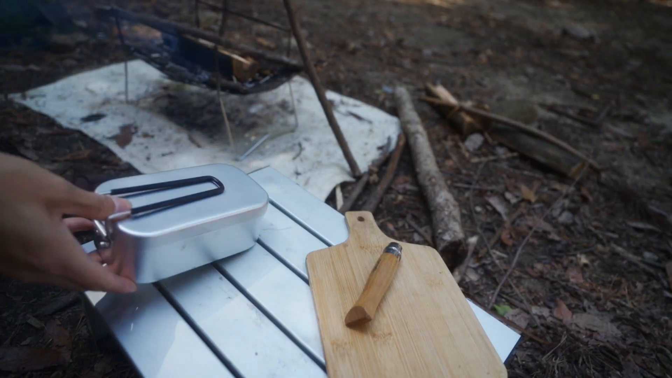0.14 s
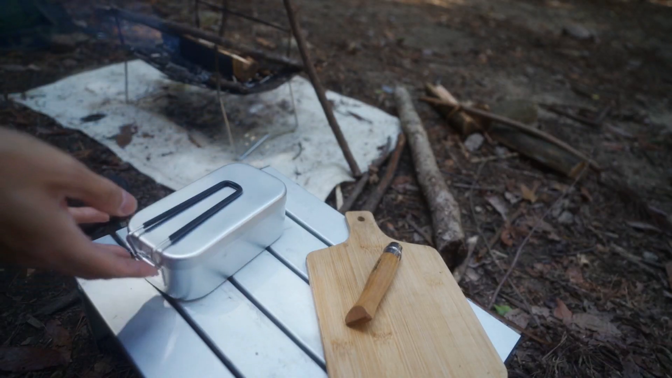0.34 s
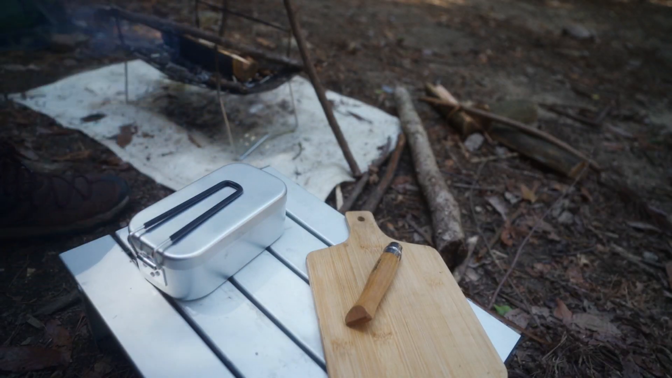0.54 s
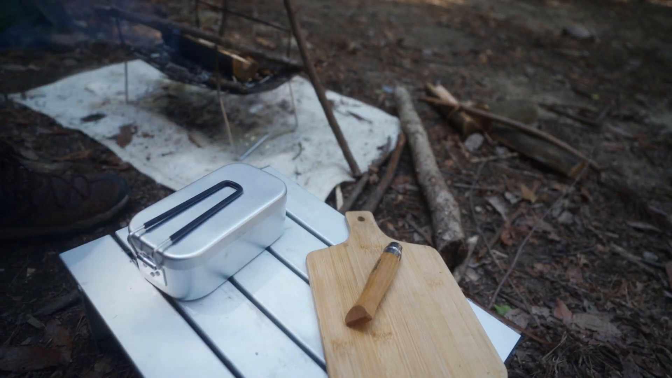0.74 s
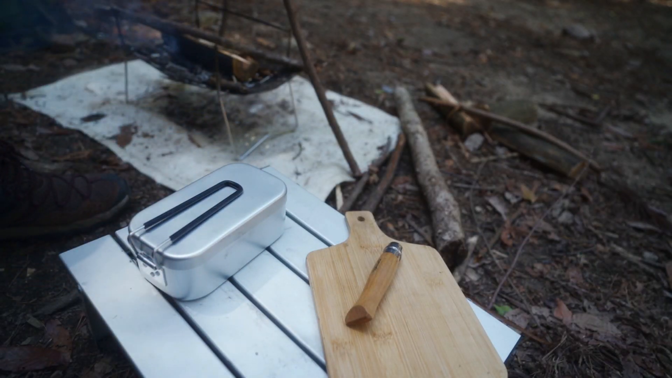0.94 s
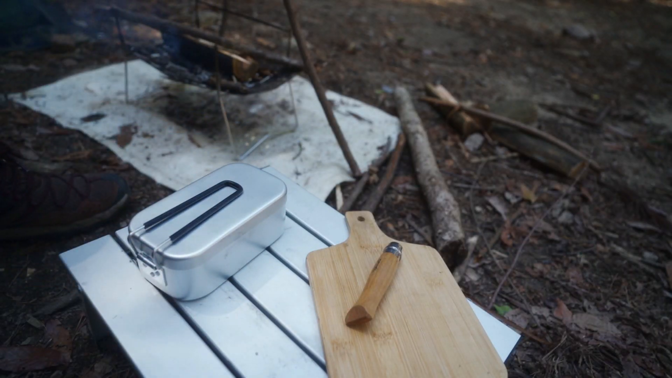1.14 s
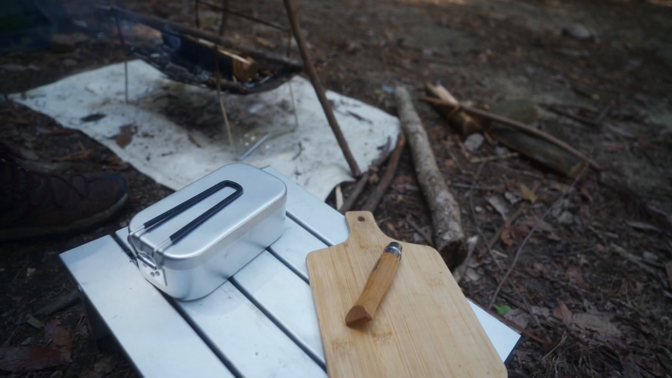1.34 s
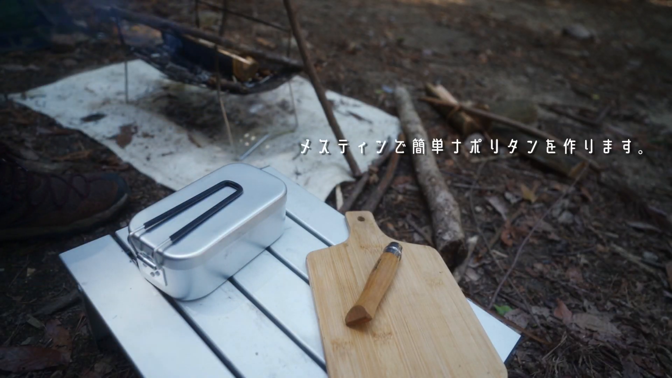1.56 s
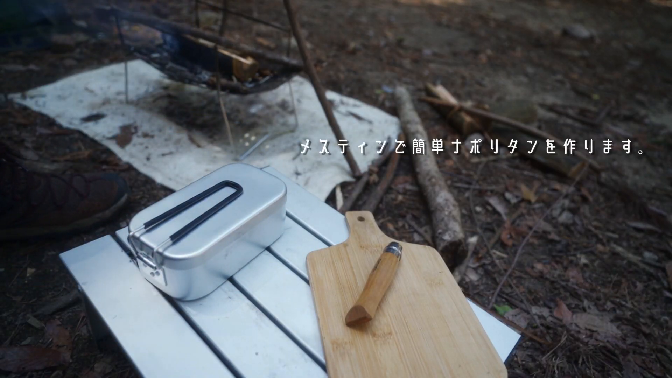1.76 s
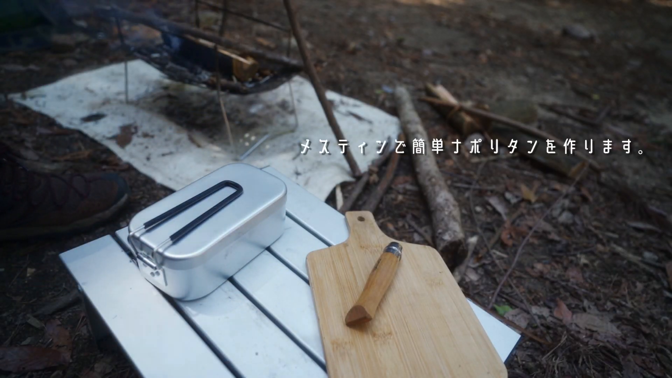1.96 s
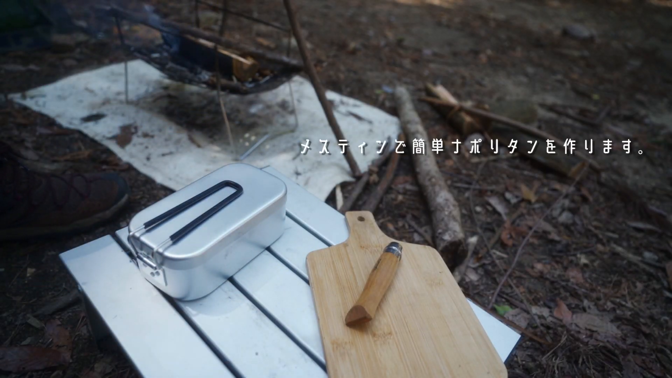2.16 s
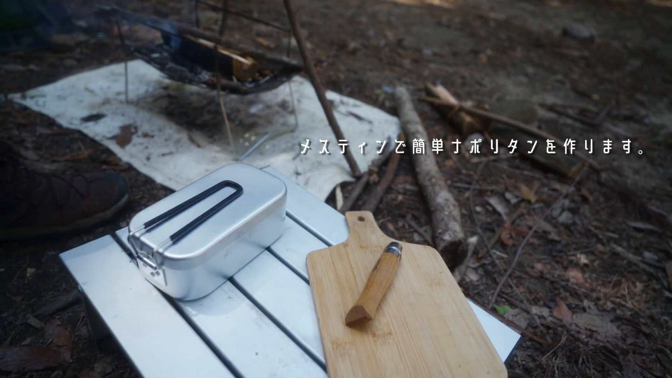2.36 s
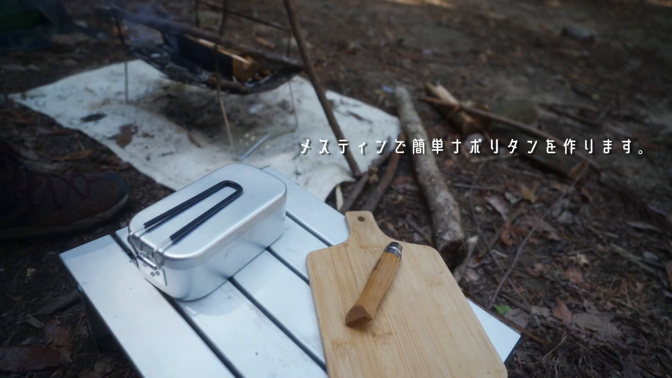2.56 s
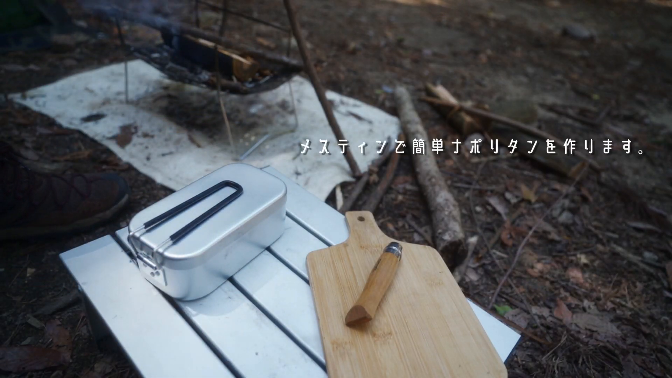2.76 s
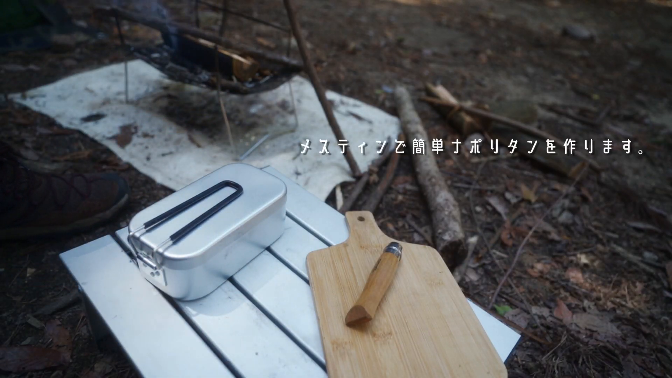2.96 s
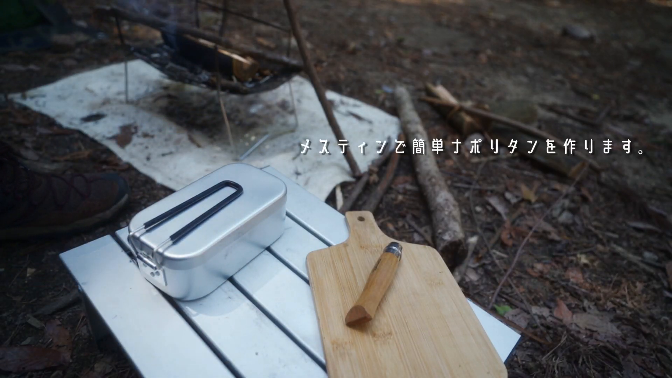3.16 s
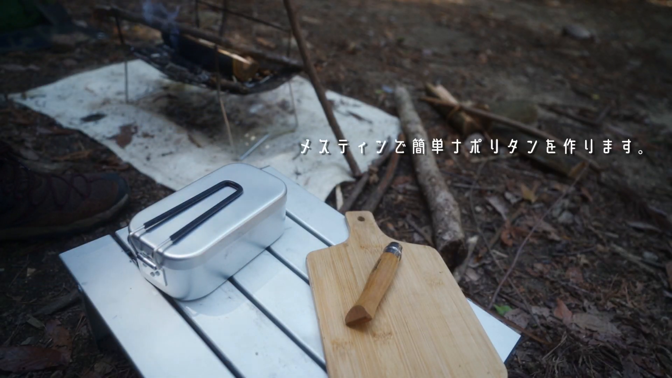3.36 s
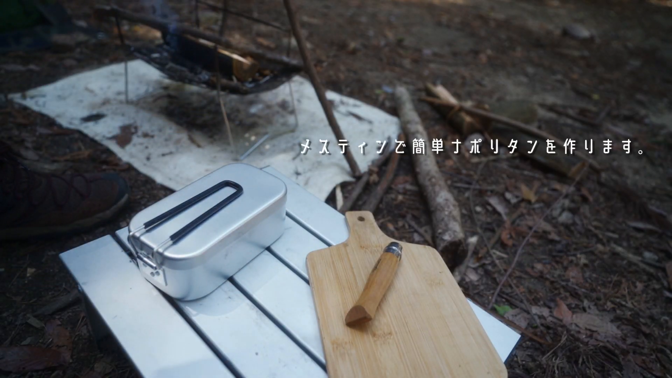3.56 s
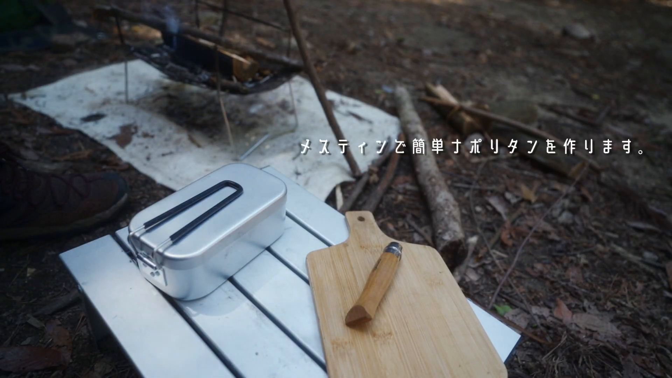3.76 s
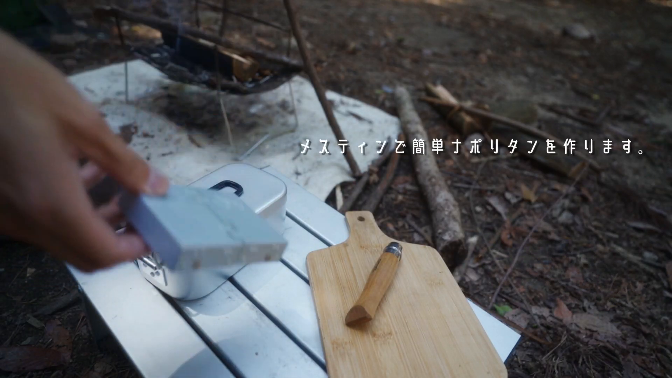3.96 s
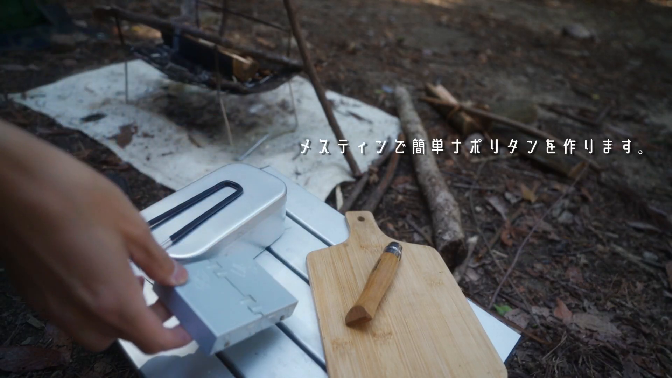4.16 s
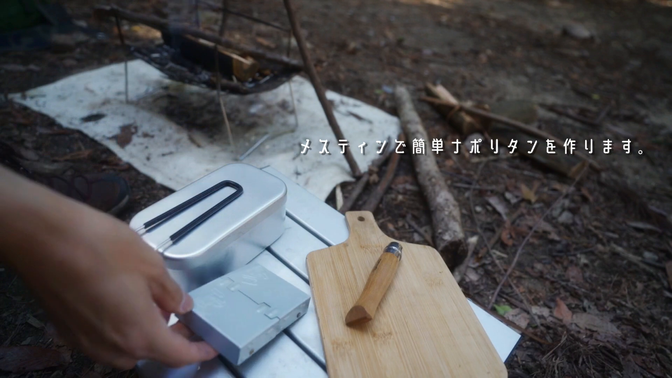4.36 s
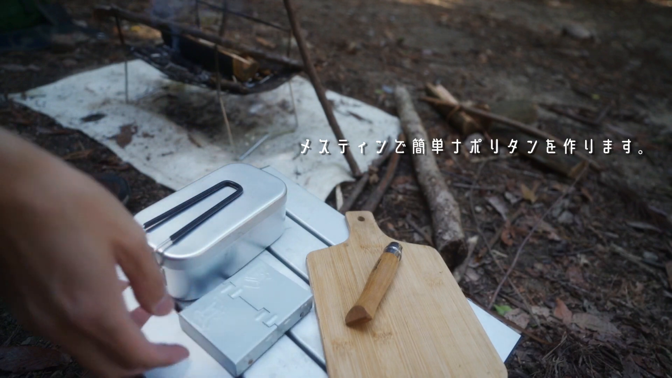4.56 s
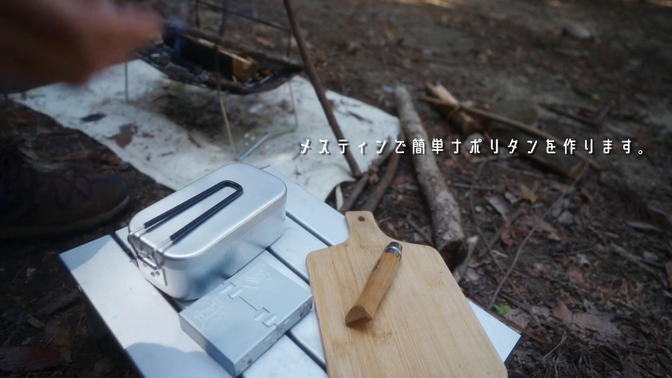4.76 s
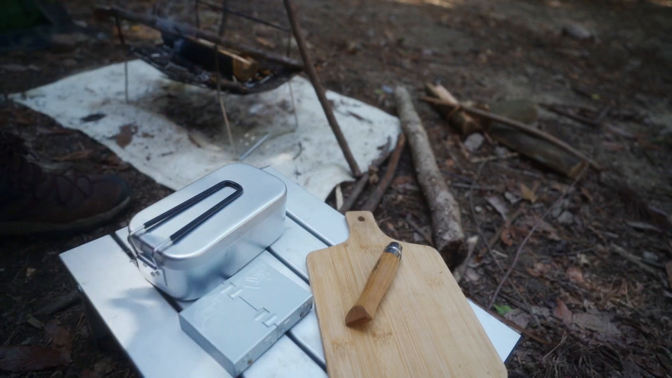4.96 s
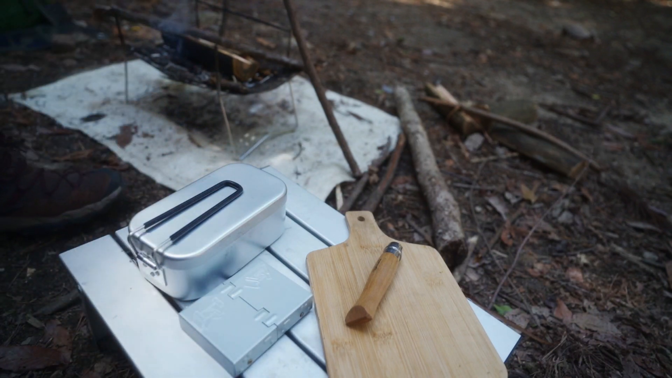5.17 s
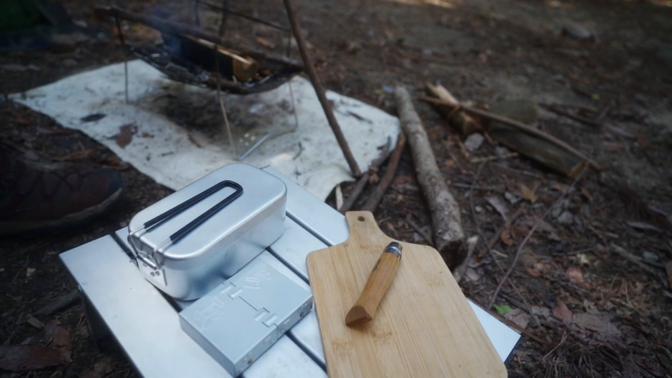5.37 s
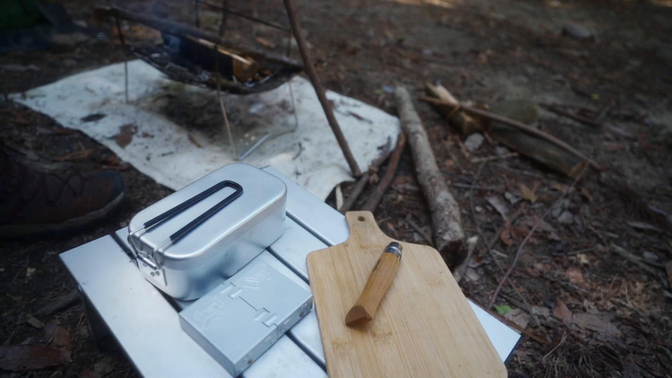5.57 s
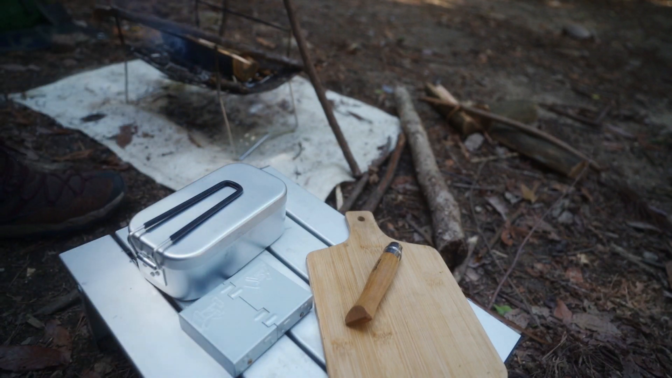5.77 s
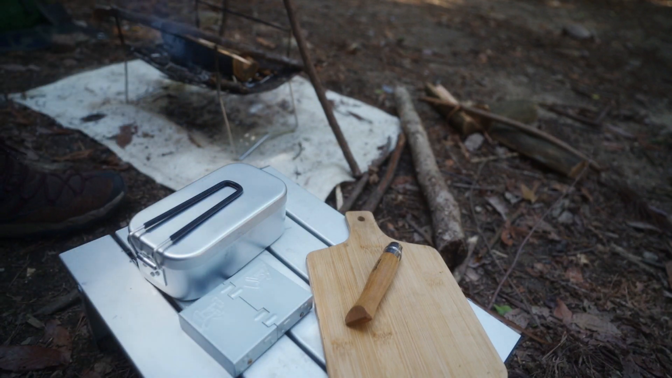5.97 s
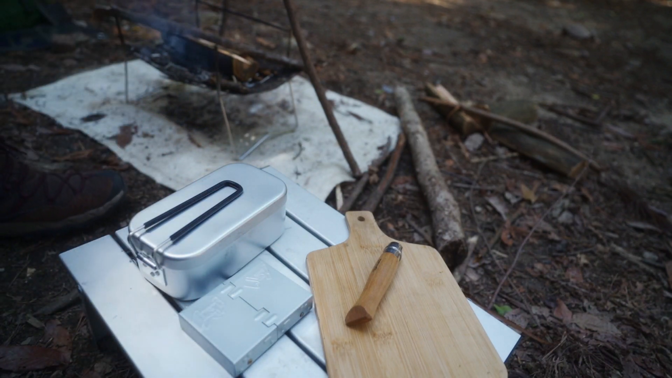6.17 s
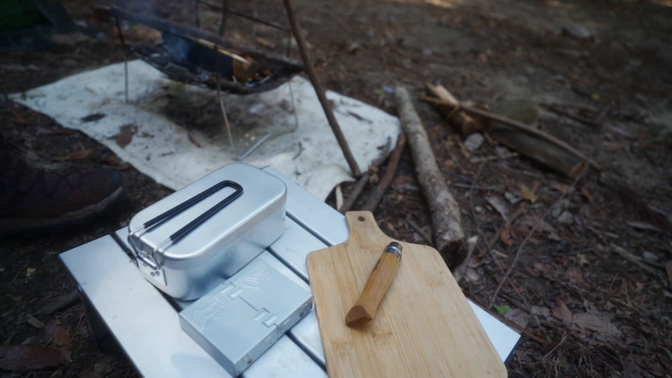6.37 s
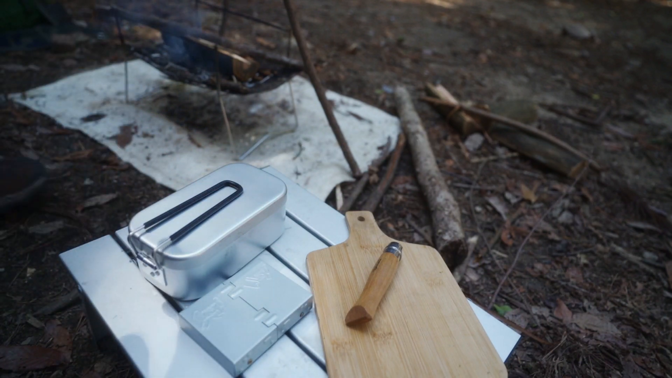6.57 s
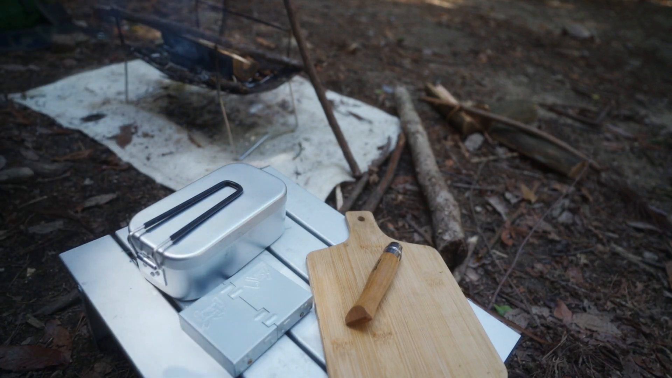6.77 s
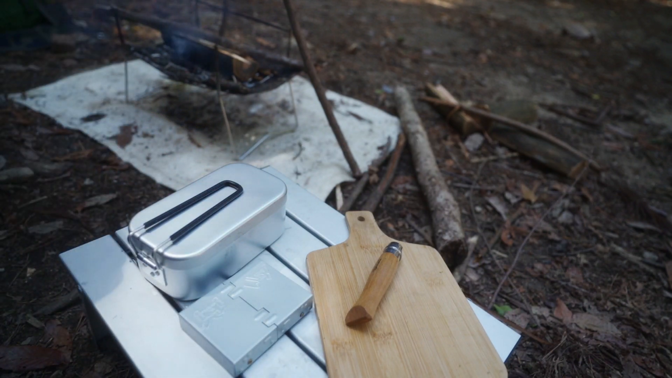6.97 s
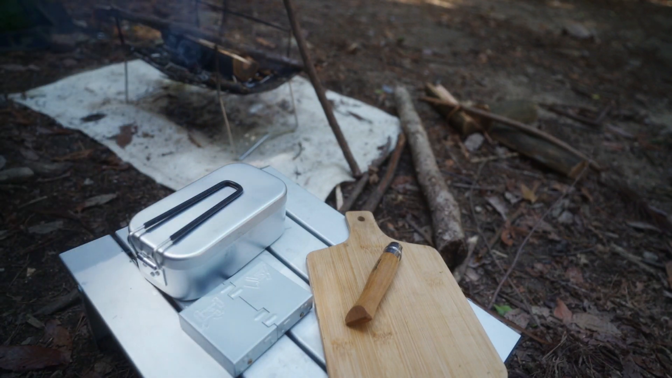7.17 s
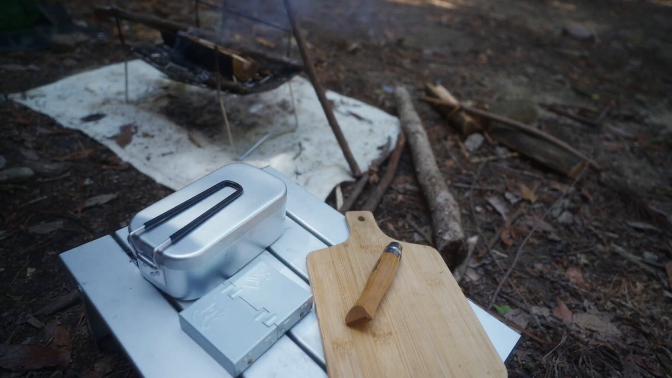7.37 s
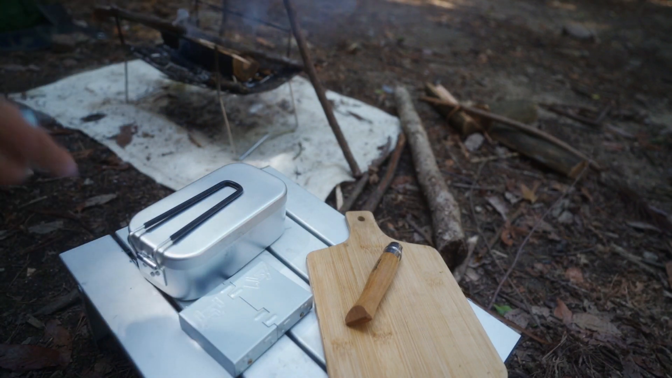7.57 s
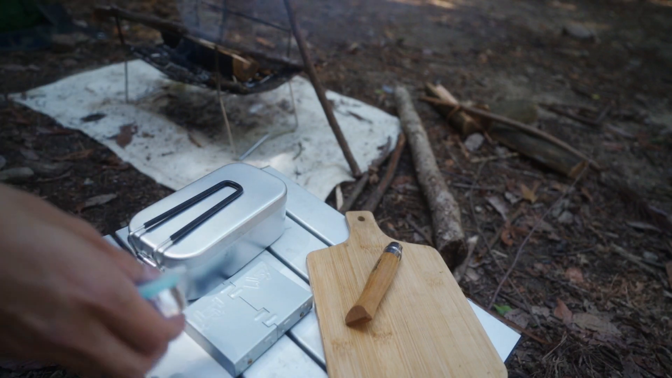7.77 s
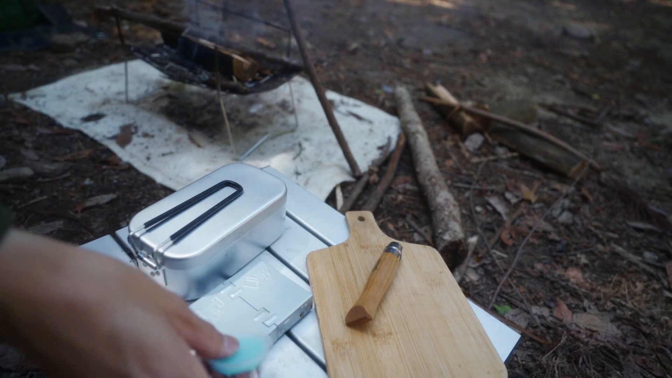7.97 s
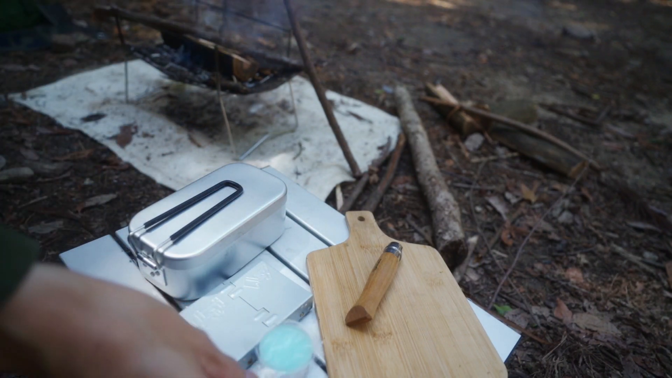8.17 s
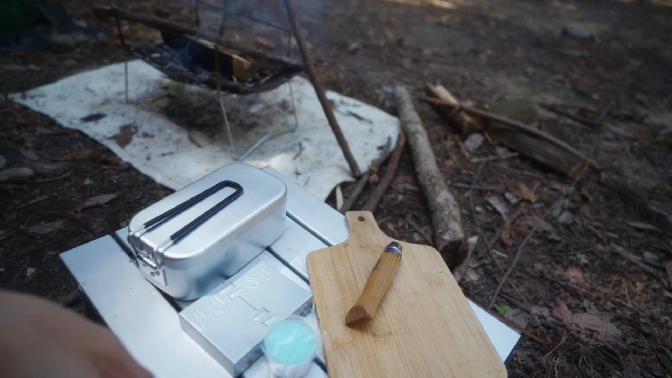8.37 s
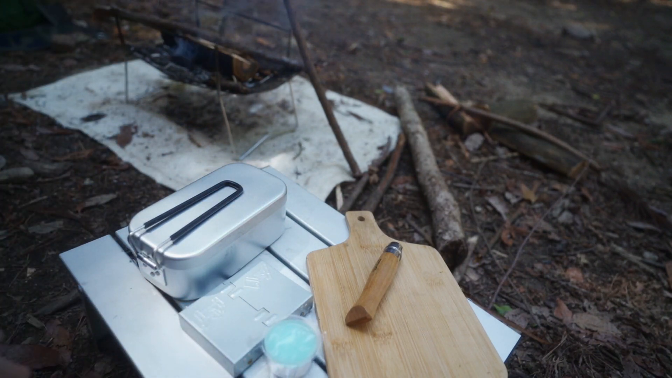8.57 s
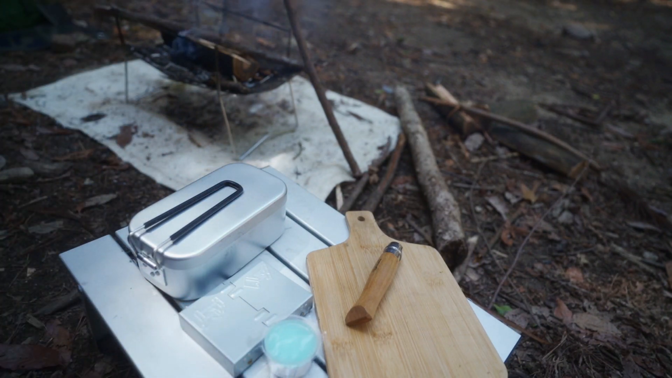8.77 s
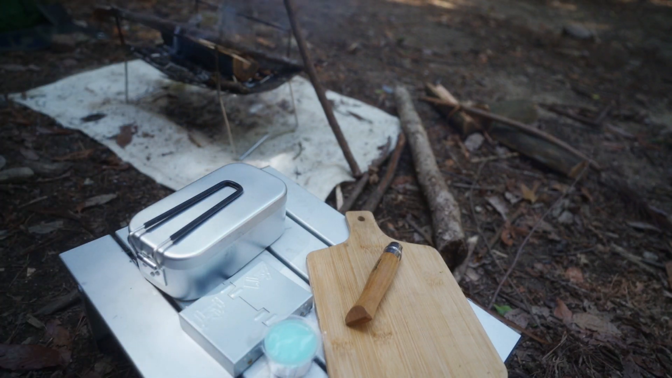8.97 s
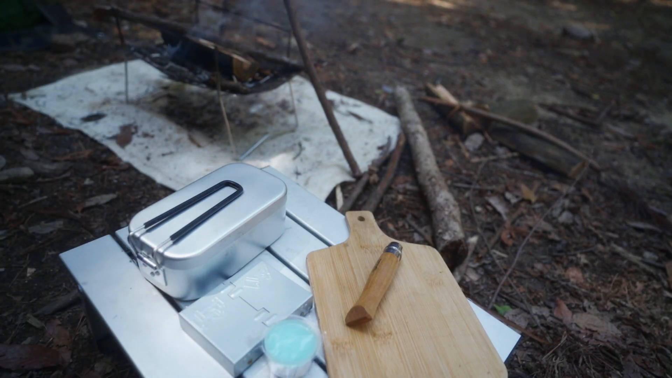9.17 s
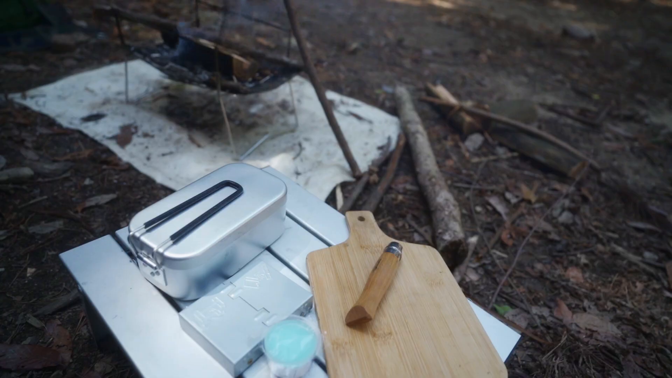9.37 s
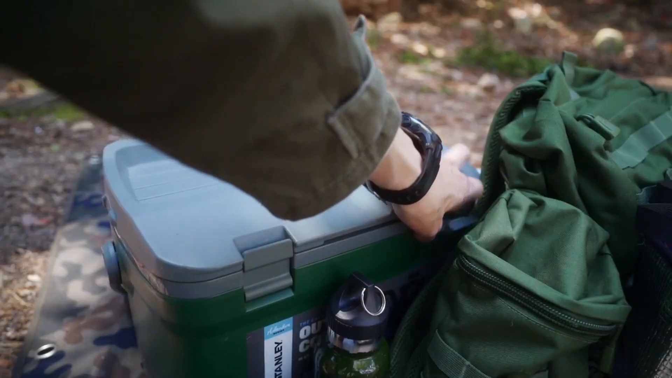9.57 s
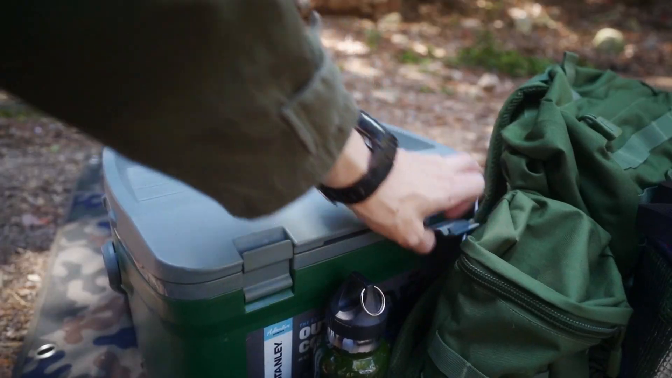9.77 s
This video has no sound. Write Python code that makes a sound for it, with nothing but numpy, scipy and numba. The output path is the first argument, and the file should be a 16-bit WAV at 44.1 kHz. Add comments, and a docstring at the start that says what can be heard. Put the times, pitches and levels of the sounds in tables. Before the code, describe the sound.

A mess tin lands close by on a slatted aluminium table with a ringing clank. Tins knock and scrape softly further off, then a folding stove clatters onto the slats. A wrapper crinkles in dry snaps, a fuel tablet is set down, and a hollow plastic cooler lid thumps. Small birds whistle faintly over quiet woodland air, rustling sleeves and light wind on the microphone.

```python
"""A woodland camp, over a bed of air, far hum, wind on the microphone and rustling sleeves and leaves.
A mess tin lands on a slatted aluminium table and both ring. A hand rummages in a box of tins, which
knock and scrape; then a folding stove clatters onto the slats. Small birds whistle through the trees
while a wrapper crinkles in dry snaps and a fuel tablet is set down. Last, a hollow cooler lid thumps."""
import sys
import numpy as np
from scipy import signal
from scipy.fft import rfft, irfft
from scipy.io import wavfile
from scipy.ndimage import uniform_filter1d
from numba import njit

SR = 44100
rng = np.random.default_rng(int(sys.argv[2]) if len(sys.argv) > 2 else 0)


def materialize(psi):
    """Save the field psi as 16-bit PCM at rate SR to the path in sys.argv[1].

    A 1-D psi becomes a single channel; in a 2-D psi each row is a channel.
    """
    bounded = np.clip(np.atleast_2d(psi).T, -1, 1)
    quanta = np.round(bounded * 32767).astype(np.int16)
    wavfile.write(sys.argv[1], SR, quanta)


N = 433062
T = np.arange(N) / SR

# tone of the air bed: (frequency [Hz], relative level [dB])
AIR_SPECTRUM = [(15, -42.5), (25, -5), (66, -1.5), (123, -22), (157, -2), (256, -9.5), (439, -11.5),
                (1020, -11), (3340, -46.5), (4030, -32.5), (4870, -29.5), (13200, -32), (16000, -45)]
# fader ride on the far hum: (time [s], level [dB])
HUM_RIDE = [(0, -66.5), (1.2, -70), (1.86, -71.5), (2.4, -66), (3.6, -68.5), (4.0, -73.5), (6.8, -77),
            (7.1, -67.5), (9.82, -78.5)]
# wind puffs and ground thumps: (start [s], length [s], wind level [dB], hum level [dB])
PUFFS = [(.12, 0.52, -59.5, -61.5), (3.55, 0.4, -63, -75), (4.4, 0.38, -62, -73), (5.497, 0.82, -69.5, -83),
         (6.444, .6, -67, -84), (7.299, 0.24, -59.5, -73), (8.101, .2, -63.5, -58.5),
         (8.7, 0.64, -69.5, -78), (9.58, 0.26, -48, -49)]

# shape of each bird call: (time into the call [s], pitch [Hz], relative level [dB])
HIGH_CALL = [(0, 2340, -8), (.004, 4430, -22.5), (.05, 5240, -13.5), (.1, 6600, -10), (.108, 6500, -34.5),
             (.118, 4760, -24), (.125, 2900, -11), (.138, 2786, -39), (.148, 2900, -11),
             (.152, 4600, -10.5), (.158, 4570, -45)]
LOW_CALL = [(0, 3270, -10), (.01, 4775, -11), (.04, 4755, -9.5), (.07, 5404, -0.5), (.078, 5430, -21),
            (.085, 4750, -0.5), (.095, 3300, -8.5), (.115, 3820, -14), (.125, 3627, -50)]
SHORT_CALL = [(0, 3965, 12), (.03, 4370, -12), (.09, 4400, -17), (.11, 4370, -30.5)]
THIN_CALL = [(0, 3800, -4), (.03, 3950, 0), (.1, 4000, -3), (.25, 4250, -8), (.42, 4400, -10),
             (.46, 4400, -40)]
WISP_CALL = [(0, 6700, -9), (.05, 7000, 1.5), (.2, 6900, -4), (.3, 6940, -25.5)]
FALLING_CALL = [(0, 3890, -13), (.04, 3780, -10), (.06, 3414, -1), (.09, 3200, -3.5), (.13, 3000, -9),
                (.15, 3030, -37)]
# cues for those calls: (time [s], level [dB])
HIGH_CUES = [(8.252, -44.5), (8.575, -42.5), (8.89, -39.5), (9.205, -41)]
LOW_CUES = [(3.3, -66.5), (6.651, -51.5), (6.935, -49.5), (7.227, -49)]
SHORT_CUES = [(3.5, -62.5)]
THIN_CUES = [(5.26, -71), (5.92, -67.5)]
WISP_CUES = [(5.639, -71), (6.33, -74)]
FALLING_CUES = [(7.976, -54)]

# cloth and dry leaves stir: (start [s], length [s], hiss level [dB], dull level [dB])
RUSTLES = [(-.15, 0.84, -59, -62.5), (3.102, 0.4, -69.5, -72), (3.701, 0.92, -60, -63),
           (4.642, 0.62, -58.5, -64), (5.055, 0.086, -59, -60), (5.195, 0.73, -69.5, -78.5),
           (5.848, 0.25, -55.5, -64), (6.363, 0.52, -54.5, -58), (6.565, 0.17, -53, -49),
           (6.874, 0.33, -58.5, -65), (7.127, 0.49, -57.5, -62), (7.564, 0.084, -48, -56),
           (7.694, 0.26, -55, -63.5), (7.976, 0.38, -54.5, -62.5), (8.699, 0.39, -67, -76),
           (9.545, 0.38, -60.5, -57)]
# a sleeve swishes past: (start [s], length [s], level [dB])
SWISHES = [(-.1, .8, -62), (3.743, 0.62, -59.5), (4.66, 0.59, -59)]
# wrapper, twig and ember ticks: (time [s], level [dB], centre [Hz], width [octaves])
TICKS = [(0.971, -42.5, 1980, 3.5), (0.7044, -61, 12000, 1.2), (1.466, -38, 7420, 5.8),
         (1.4855, -14.5, 11000, 1), (3.3108, -46, 6280, 2.1), (3.4094, -28.5, 8650, 6.5),
         (5.0185, -43.5, 1243, 1.5), (5.073, -42.5, 1210, 6.1), (5.1841, -40.5, 3250, 1.65),
         (5.336, -47.5, 2530, 2.5), (5.5515, -49, 1000, 1.2), (5.718, -48.5, 1650, 1.07),
         (6.297, -50, 13030, 0.46), (6.444, -34, 1070, 4.6), (6.597, -15.5, 4020, 2.7),
         (6.6118, -11.5, 2640, 1.8), (6.75, -37, 1480, 2.2), (6.887, -42, 8960, 1.7),
         (6.9345, -42, 2720, 3.1), (7.3154, -26, 6130, 14), (7.33, -27, 4970, 0.58),
         (7.3468, -29.5, 4600, 0.94), (7.385, -34, 4020, 1.7), (7.413, -29.5, 6890, 7.8),
         (7.43, -32.5, 6260, 4.7), (7.4476, -35, 2430, 2.1), (7.4828, -35, 2650, 0.9),
         (7.585, -37, 2950, 0.83), (7.594, -27.5, 3150, 0.9), (7.6144, -28, 3320, 1.1),
         (7.623, -36, 3750, 0.53), (7.6707, -19.5, 4600, 1.22), (7.6807, -19, 5400, 6.4),
         (7.7634, -27.5, 1920, 2), (7.7767, -25.5, 3640, 1.7), (7.8052, -28, 1730, 1.8),
         (7.8687, -28, 5870, 6.2), (7.886, -23.5, 8670, 8.8), (7.908, -28, 5890, 5.9),
         (7.917, -25, 2140, 2.4), (7.9687, -36, 2800, 1.8), (8.0137, -30.5, 1390, 3.5),
         (8.0696, -35.5, 3120, 0.66), (8.1253, -33.5, 3780, 1), (8.1332, -30, 1960, 1.2),
         (8.6177, -44.5, 7500, 1.4), (8.3627, -23.5, 6430, 3.9), (8.7111, -21, 4300, 1.9),
         (8.735, -35.5, 4030, 1.3), (8.754, -25, 1040, 4.6), (9.1488, -25, 4000, 1.7)]

# hits, with bass (below 800 Hz) and treble (above 2.5 kHz) set against the level:
# (time [s], level [dB], bass [dB], treble [dB], pitch the struck spot favours [Hz])
BOX_HITS = [(1.246, -41, 3.5, -10.5, 1410), (1.407, -47, 2, -0.5, 1280), (1.484, -34.5, 4.5, 7.5, 1092),
            (1.511, -34, 3, -0.5, 1010), (1.584, -48, 8, -17, 1020), (1.621, -36, 0, 5.5, 980),
            (1.671, -35, 5.5, -13, 1240), (1.688, -44, 10.5, -3, 1620), (1.758, -53, 10.5, 0, 1600),
            (1.803, -37.5, 6, -5, 1130), (1.832, -48.5, 16, 5, 1120), (1.925, -33.5, 2, 5, 1460),
            (1.949, -42.5, 9, 1, 1350), (1.983, -34, 4, -10, 1020), (2.074, -44, -19, -0.5, 1546),
            (2.166, -46, 2, 1.5, 2460), (2.222, -33.5, 3, -1, 1086), (2.29, -37, 1.5, -4.5, 1130),
            (2.369, -48.5, 10, -0.5, 1140), (2.436, -49, 6, 3, 1440), (2.501, -41.5, 9, -26, 1100),
            (2.558, -44, 2, -8, 1570), (2.723, -46, -2.5, -14, 1094), (2.826, -42.5, -0.5, -11.5, 1084),
            (2.905, -29.5, 0.5, 8.5, 2470), (2.971, -42.5, -15, -9, 1510), (3.003, -23.5, -13, 2.5, 1540),
            (3.028, -30, 2, 5, 1485), (3.068, -48, -10, 18, 1500), (3.095, -36, -2, 6.5, 1090),
            (3.194, -44.5, -31, -7, 1490), (3.508, -42.5, -26, -2.5, 1530), (3.763, -38, -29, -1, 1530),
            (3.904, -34.5, -29, -4, 1583), (5.756, -41.5, -5.5, -3, 2210), (5.883, -39, -5.5, 4.5, 2140)]
COOLER_HITS = [(9.6, -5.5, 5.3, -15, 1038), (9.635, -26.5, 15, -17, 842), (9.716, -36.5, 12.2, -14, 870)]
TIN_HITS = [(0.123, -4.5, -2.5, -11, 1720), (0.15, -15.5, -11, -12, 1650), (0.177, -18, 3.5, -39, 1600),
            (0.279, -33.5, -9.5, -12, 1770), (0.341, -1.5, -25, -14, 1870), (0.364, -15, -12, -18, 1600),
            (0.389, -13, -6.5, -12.5, 1064), (0.413, -23.5, -6, -10, 1650)]
STOVE_HITS = [(4.335, -7.5, -17, -7, 802), (4.388, -30.5, -23, -2, 1760), (4.419, -43, -22, 13, 1750),
              (4.454, -30, -1, -8.5, 1820), (4.545, -10.5, -7, -14, 1196), (4.553, -6.5, -16, -8.5, 1650),
              (4.58, -15, -11.5, -15.5, 1650), (4.604, -8.5, -6, -16.5, 1830),
              (4.644, -22, -19, -13.5, 1750), (4.669, -34.5, 7, -18, 921), (4.689, -35.5, 5, -26, 1000)]
TABLET_HITS = [(8.013, -41, 7, -14, 900), (8.152, -8, 1.5, -13, 1970), (8.161, -14.5, 0, -21, 1650),
               (8.195, -14.5, 3.5, -14.5, 1780), (8.23, -19, -1.5, -15, 1776), (8.258, -40, 14, -17, 1660),
               (8.288, -37.5, -6, -6, 1200)]
# drags along a surface: (start [s], length [s], level [dB], treble against the level [dB])
BOX_DRAGS = [(1.47, 0.22, -52.5, -16), (1.72, 0.23, -54.5, -6.5), (1.94, 0.21, -50.5, -3.5),
             (2.14, 0.44, -59, -15), (2.84, .06, -52.5, -4), (2.9, 0.241, -43, -2),
             (3.19, 0.054, -60.5, 3.5)]
COOLER_DRAGS = [(9.547, 0.055, -53, 1.5), (9.621, 0.068, -42.5, 10), (9.69, .14, -49.5, -10),
                (9.744, 0.038, -46.5, 8)]
TIN_DRAGS = [(.16, .18, -37.5, -6), (0.264, .075, -39.5, 2), (0.347, .07, -25, -9)]
STOVE_DRAGS = [(4.359, 0.14, -37.5, -0.5), (4.537, 0.005, -25, -4), (4.555, .065, -25, -3)]
TABLET_DRAGS = [(8.16, 0.08, -29.5, -16), (8.25, 0.074, -48, -9)]
# resonances of each body: (frequency [Hz], relative level [dB], free ring time to -60 dB [s])
BOX_MODES = [(312, -10, 0.12), (420, -2, 0.078), (438.4, -5.5, 0.3), (490, -3.5, 0.17), (612, -10.5, 0.21),
             (740, -12.5, 0.17), (1005, -3.5, 0.12), (1060, 1.5, 0.36), (1129, 4, 0.11), (1268, -2.5, 0.23),
             (1500, 6, 0.19), (1620, 10.5, 0.048), (2158, 2.5, 0.12), (2493, 6, 0.074), (2890, -2, 0.2),
             (3470, -32, 0.066), (4000, -25.5, 0.058), (4750, 1, 0.016), (5000, 4.5, 0.11),
             (5960, 8.5, 0.076), (7050, 9.5, 0.08), (7500, -12, 0.21), (7070, 3, 0.078)]
COOLER_MODES = [(82, -2, 0.18), (125, -9.5, 0.31), (198, 8, 0.11), (230, -2.5, 0.14), (299, 7, 0.15),
                (377, -1.5, 0.18), (488, 6.5, 0.11), (700, 2, 0.065), (890, -15, 0.023), (1103, 13, 0.027),
                (1355, 4, 0.065), (1774, 0, 0.095), (2170, 5, 0.029), (2720, 4, 0.058), (3730, 10.5, 0.031),
                (4320, 1, 0.089)]
TABLE_MODES = [(308, -14.5, 0.35), (433.8, -2, 0.18), (512, -4.5, 0.17), (591, -4.5, 0.16), (747, -7.5, .2),
               (904, -0.5, 0.1), (1256, -0.5, 0.16), (1652, 5.5, 0.16), (1731, -3, 0.11), (1813, -6, 0.23),
               (1905, -3.5, 0.27), (2450, -8.5, 0.044), (2550, -9, .12), (2660, -2, .1), (2924, -2.5, 0.13),
               (3180, -2, 0.17), (3960, -8.5, 0.06), (4600, -7.5, 0.27), (4915, -9, .06)]
TIN_MODES = [(131, -15.5, 0.27), (222, -14.5, 0.13), (730, -6.5, 0.065), (1071, -4, .42),
             (1127, -4.5, 0.26), (1470, -6, 0.079)]
STOVE_MODES = [(640, -8.5, 0.17), (840, 0.5, 0.19), (1000, 0, 0.17), (1055, -14, 0.3), (2160, 2.5, 0.084),
               (3160, -13.5, .1), (8540, -5.5, 0.18)]
TABLET_MODES = [(423, -6, 0.3), (1012, 6.5, 0.093), (1210, -9.5, 0.88), (1335, 0.5, 0.14), (2070, -4, 0.22)]


def undb(db):
    """Decibels to gain."""
    return 10 ** (np.asarray(db) / 20)


def band(lo_hz, hi_hz, order=2):
    """Band-passed noise at unit level."""
    sos = signal.butter(order, [lo_hz, min(hi_hz, .45 * SR)], "bandpass", fs=SR, output="sos")
    noise = signal.sosfilt(sos, rng.standard_normal(N))
    return noise / np.std(noise)


def wobble(rate_hz):
    """Random modulator that glides from value to value; spread near 1."""
    step = int(SR / rate_hz)
    return uniform_filter1d(np.repeat(rng.standard_normal(N // step + 1), step), step)[:N]


def swells(start_s, length_s, db, fade):
    """Envelope of overlapping swells; fade-in and fade-out each take a share of the length."""
    power = np.zeros(N)
    for s, length, gain in zip(start_s, length_s, undb(db)):
        progress = (T - s) / length
        power += (gain * np.clip(np.minimum(progress, 1 - progress) / fade, 0, 1)) ** 2
    return np.sqrt(power)


def burst(start, db, t60_s, attack_s=.0012):
    """Percussive envelope: a fast attack at each start sample, then a dying tail."""
    power = np.bincount(start, undb(db) ** 2, N)[:N]
    tails = signal.lfilter([1], [1, -undb(-120 / (t60_s * SR))], power)
    lag = np.exp(-1 / (attack_s * SR))
    return np.sqrt(signal.lfilter([1 - lag], [1, -lag], tails))


def low_cut(x, hz):
    """Roll off the bass that a small, light body cannot radiate."""
    return signal.sosfilt(signal.butter(2, hz, "highpass", fs=SR, output="sos"), x)


def air(bed_db=-68.5, breeze_db=-71):
    """Steady woodland air, a wavering far hum and wind rumbling on the microphone."""
    hz, db = np.transpose(AIR_SPECTRUM)
    tone_db = np.interp(np.log(np.arange(N // 2 + 1) * SR / N + 1), np.log(hz), db)
    bed = irfft(rfft(rng.standard_normal(N)) * undb(tone_db), N)
    s, length, wind_db, hum_db = np.transpose(PUFFS)
    hum_ride = undb(np.interp(T, *np.transpose(HUM_RIDE)))
    hum = np.hypot(hum_ride, swells(s, length, hum_db, fade=.3)) * band(38, 88)
    breeze = undb(breeze_db + 2.5 * wobble(3))
    wind = np.hypot(breeze, swells(s, length, wind_db, fade=.3)) * band(18, 81)
    return undb(bed_db + .8 * wobble(27)) * bed / np.std(bed) + hum + wind


def birds(echo_t60_s=.28, echo_db=2.5):
    """Near-sine whistles, unsteady in pitch, with the echo of the trunks behind them."""
    dry = np.zeros(N)
    voices = ((HIGH_CALL, HIGH_CUES, .018), (LOW_CALL, LOW_CUES, .02), (SHORT_CALL, SHORT_CUES, .02),
              (THIN_CALL, THIN_CUES, .04), (WISP_CALL, WISP_CUES, .015),
              (FALLING_CALL, FALLING_CUES, .015))
    for call, cues, waver in voices:
        s, hz, db = np.transpose(call)
        for cue_s, cue_db in cues:
            i, t = int(cue_s * SR), T[:int(s[-1] * SR)]
            pitch = np.interp(t, s, hz) * (1 + waver * wobble(250)[:len(t)])
            whistle = np.sin(2 * np.pi * np.cumsum(pitch) / SR)
            dry[i:i + len(t)] += undb(cue_db + np.interp(t, s, db)) * whistle
    t = T[:SR // 2]
    echo = rng.standard_normal(len(t)) * undb(-60 * t / echo_t60_s)
    return dry + undb(echo_db) * signal.fftconvolve(dry, echo / np.sqrt(np.sum(echo ** 2)))[:N]


def rustle():
    """Cloth and dry leaves hiss in crackly patches over a leafy murmur; sleeves swish past."""
    s, length, hiss_db, dull_db = np.transpose(RUSTLES)
    crackle = burst(rng.integers(0, N, 1500), 2.5 * rng.exponential(size=1500), t60_s=.01)
    grain = np.hypot(1, crackle) / 2
    hiss = undb(wobble(28)) * band(3300, 9500) + undb(-10 + wobble(27)) * band(7800, 21000)
    dull = undb(wobble(33)) * band(260, 2300)
    sleeve = swells(*np.transpose(SWISHES), fade=.62) * band(4800, 7400, order=1)
    # the floor under each envelope is the steady murmur of the leaves
    hiss_gain = np.hypot(swells(s, length, hiss_db, fade=.25), undb(-67))
    dull_gain = np.hypot(swells(s, length, dull_db, fade=.14), undb(-64.5))
    return hiss_gain * hiss * grain + dull_gain * dull + sleeve


def ticks(click_t60_s=.0018, tail_t60_s=.028):
    """Wrapper, twigs and embers snap: a sharp click and a short noisy tail, band-passed."""
    out, t = np.zeros(N), T[:SR // 10]
    envelope = undb(-60 * t / click_t60_s) + undb(-12.5 - 60 * t / tail_t60_s)
    for (s, db, hz, octaves), noise in zip(TICKS, rng.standard_normal((len(TICKS), len(t)))):
        edges_hz = np.clip(hz * 2 ** (np.array([-.4, .6]) * max(octaves, .3)), 200, 16000)
        sos = signal.butter(2, edges_hz, "bandpass", fs=SR, output="sos")
        snap = signal.sosfilt(sos, noise * envelope)
        out[int(s * SR):int(s * SR) + len(t)] += undb(db) * snap / np.max(np.abs(snap))
    return out


@njit
def ring(n, start, hz, t60, gain, sr):
    """Each contact starts one dying sine per mode."""
    out = np.zeros(n)
    for hit in range(len(start)):
        for mode in range(hz.shape[1]):
            step = np.exp(2j * np.pi * hz[hit, mode] / sr - np.log(1000) / (t60[hit, mode] * sr))
            phasor = gain[hit, mode] + 0j
            for i in range(start[hit], min(n, start[hit] + int(.8 * t60[hit, mode] * sr))):
                out[i] += phasor.imag
                phasor *= step
    return out


def skid(hits, ring_share, skid_s):
    """Each hit skids through four fading contacts: rows as in the hit tables, plus a ring share."""
    lateness = np.sort(rng.random((len(hits), 4)), axis=1)
    lateness[:, 0] = 0
    contacts = np.repeat(np.c_[np.array(hits), np.full(len(hits), ring_share)], 4, axis=0)
    contacts[:, 0] += skid_s * lateness.ravel()
    contacts[:, 1] -= 5.52 + 12.3 * lateness.ravel()  # later contacts are softer
    return contacts


def rattle(hits, drags, per_s, send_db, t60_s, bass_db, ring_share=.4, gate_db=-68):
    """Tiny random contacts, in rows like skid's: they die away after a hit, and drags keep them up."""
    hit_s, hit_db, _, hit_treble_db, _ = np.transpose(hits)
    drag_s, length, drag_db, drag_treble_db = np.transpose(drags)
    start = (hit_s * SR).astype(int)
    level = np.hypot(burst(start, hit_db + send_db, t60_s), swells(drag_s, length, drag_db, fade=.15))
    bright = np.hypot(burst(start, hit_db + hit_treble_db + send_db, t60_s),
                      swells(drag_s, length, drag_db + drag_treble_db, fade=.21))
    gap, force, spot = rng.random((7000, 3)).T
    s = -np.cumsum(np.log(gap)) / per_s
    i = np.minimum(s * SR, N - 1).astype(int)
    level_db, bright_db = 20 * np.log10(level[i] + 1e-9), 20 * np.log10(bright[i] + 1e-9)
    overlap_db = 10 * np.log10(per_s * .022)  # overlapping contacts add up, so each is trimmed
    db = level_db - 2 * np.log(force) - overlap_db
    spot_hz = 800 + 1700 * spot
    contacts = np.c_[s, db, np.full_like(s, bass_db), bright_db - level_db,
                     spot_hz, np.full_like(s, ring_share)]
    return contacts[(level_db > gate_db) & (i < N - 1)]


def struck(skids, rattles, modes, scatter_db, detune, detune_per_khz,
           crack_db, crack_s, fizz_db, fizz_s, top_db):
    """Every contact rings the body's modes, with a midrange crack and a bright fizz on the attack."""
    s, db, bass_db, treble_db, spot_hz, ring_share = np.vstack([skids, rattles]).T
    hz, mode_db, free_t60 = np.transpose(modes)
    start = (s * SR).astype(int)
    register = np.digitize(hz, [800, 2500])  # bass, mid, treble
    balance = undb(mode_db) / np.sqrt(np.bincount(register, undb(mode_db) ** 2))[register]
    scatter, polarity, drift = rng.standard_normal((len(s), 3, len(hz))).transpose(1, 0, 2)
    drive_db = np.c_[db + bass_db, db, db + treble_db][:, register] + scatter_db * scatter
    spot_boost_db = 11.8 * np.exp(-(np.log(hz / spot_hz[:, None]) / .039) ** 2)
    gain = undb(drive_db + spot_boost_db) * balance * np.sign(polarity)
    # grip and load shift the small high modes more than the low ones
    shifted_hz = hz * (1 + (detune + detune_per_khz * hz / 1000) * drift)
    body = ring(N, start, shifted_hz, np.outer(ring_share, free_t60), gain, float(SR))
    crack = band(390, 2600) * burst(start, db + crack_db, crack_s)
    sizzle = band(4100, 9000) + undb(top_db) * band(9000, 23000)
    fizz = sizzle * burst(start, db + treble_db + fizz_db, fizz_s)
    return body + crack + fizz


def box_of_tins():
    """Tins knock and scrape against each other further off."""
    skids = skid(BOX_HITS, ring_share=.43, skid_s=.01)
    rattles = rattle(BOX_HITS, BOX_DRAGS, per_s=650, send_db=-11, t60_s=.2, bass_db=-3.5)
    clatter = struck(skids, rattles, BOX_MODES, scatter_db=4, detune=.0079, detune_per_khz=.00754,
                     crack_db=-3.5, crack_s=.042, fizz_db=-.2, fizz_s=.026, top_db=-2)
    return low_cut(clatter, hz=192)


def cooler_lid():
    """The hollow plastic lid thumps and creaks."""
    skids = skid(COOLER_HITS, ring_share=.62, skid_s=.0057)
    rattles = rattle(COOLER_HITS, COOLER_DRAGS, per_s=470, send_db=-23, t60_s=.2, bass_db=7.5)
    thump = struck(skids, rattles, COOLER_MODES, scatter_db=3, detune=.003, detune_per_khz=.0049,
                   crack_db=1, crack_s=.017, fizz_db=-11, fizz_s=.079, top_db=-6.5)
    return low_cut(thump, hz=42)


def gear_on_table(lets_go_s=.35):
    """Tin, stove and tablet land, rock and slide, ringing with the slats; smaller means less bass."""
    tin_ring = np.where(np.array(TIN_HITS)[:, 0] < lets_go_s, .35, .56)  # the hand damps it at first
    gear = ((TIN_HITS, TIN_DRAGS, TIN_MODES, tin_ring, 150),
            (STOVE_HITS, STOVE_DRAGS, STOVE_MODES, .32, 300),
            (TABLET_HITS, TABLET_DRAGS, TABLET_MODES, .35, 310))
    out = np.zeros(N)
    for hits, drags, modes, ring_share, low_cut_hz in gear:
        skids = skid(hits, ring_share, skid_s=.0065)
        rattles = rattle(hits, drags, per_s=600, send_db=-18.5, t60_s=.17, bass_db=-2.5)
        clank = struck(skids, rattles, TABLE_MODES + modes,
                       scatter_db=3.5, detune=.002, detune_per_khz=.0024,
                       crack_db=-2.5, crack_s=.054, fizz_db=-1.5, fizz_s=.03, top_db=-5)
        out += low_cut(clank, low_cut_hz)
    return out


def scene():
    """Mix the props and the woodland down to mono."""
    return (gear_on_table() + box_of_tins() + cooler_lid() + ticks() + rustle() + birds() + air())[None]


def record(dry):
    """Soft-clip the peaks, then two steep low-passes remove the very top."""
    ceiling, rolloff_hz, cutoff_hz = .65, 14900, 16480
    rounded = ceiling * np.tanh(dry / ceiling)
    rolled_off = signal.sosfilt(signal.cheby1(10, .5, rolloff_hz, fs=SR, output="sos"), rounded)
    return signal.sosfilt(signal.ellip(8, .2, 70, cutoff_hz, fs=SR, output="sos"), rolled_off)


dry = scene()
out = record(dry)
materialize(out)
```